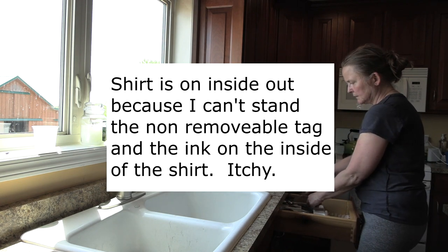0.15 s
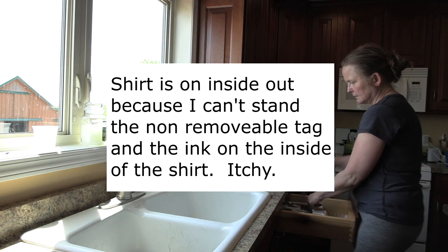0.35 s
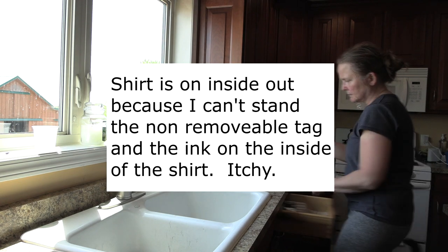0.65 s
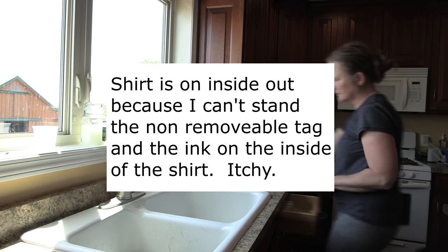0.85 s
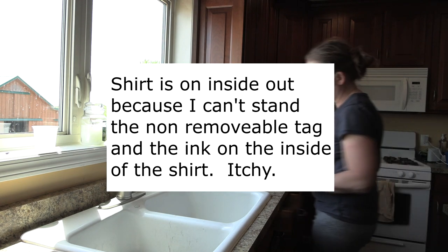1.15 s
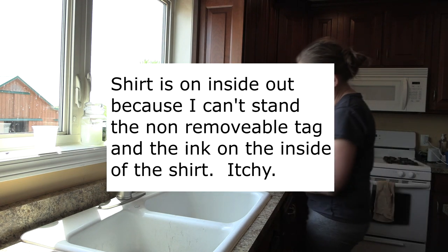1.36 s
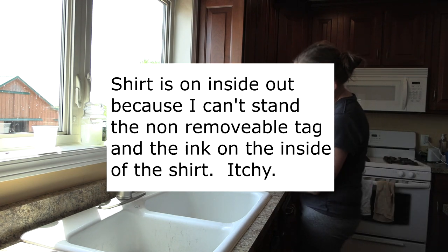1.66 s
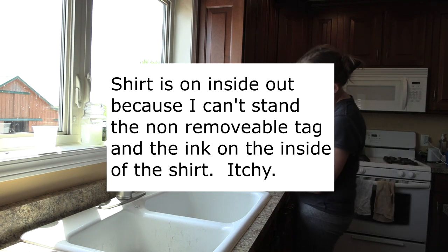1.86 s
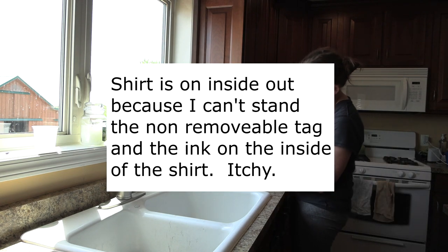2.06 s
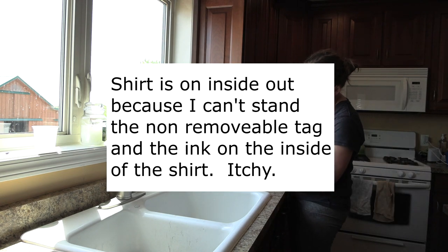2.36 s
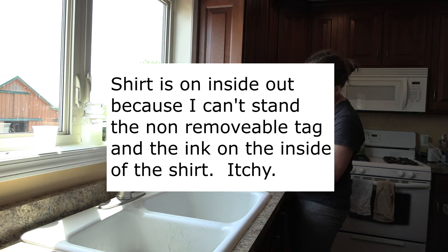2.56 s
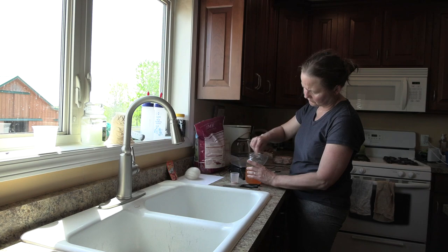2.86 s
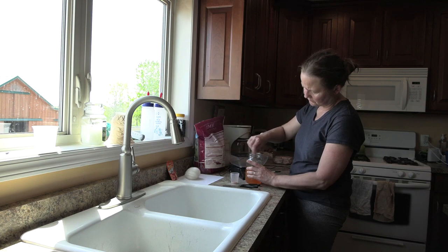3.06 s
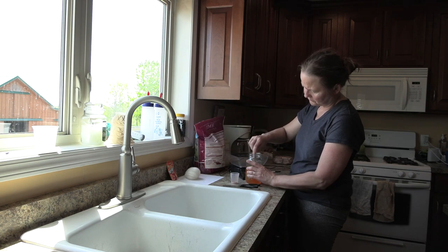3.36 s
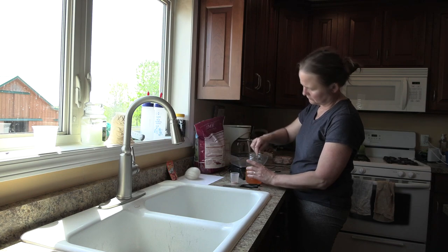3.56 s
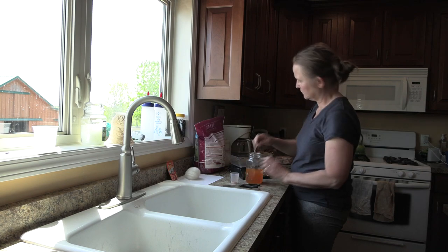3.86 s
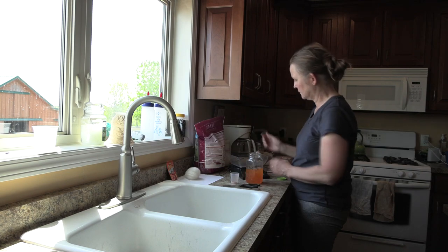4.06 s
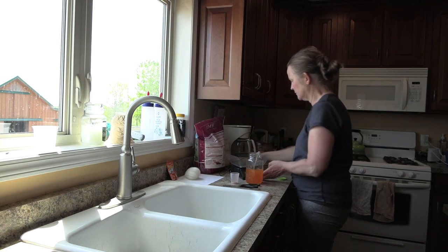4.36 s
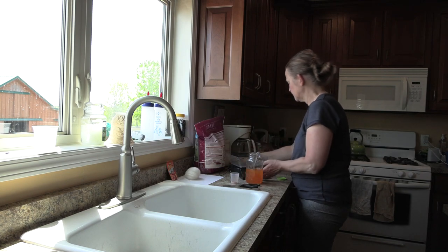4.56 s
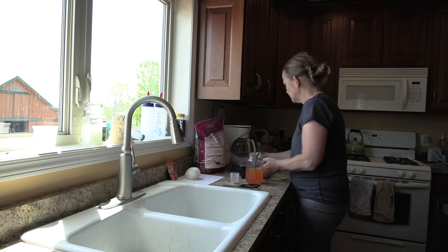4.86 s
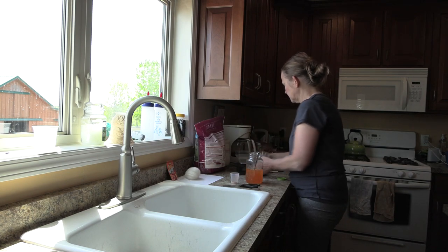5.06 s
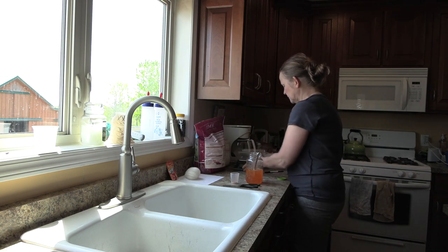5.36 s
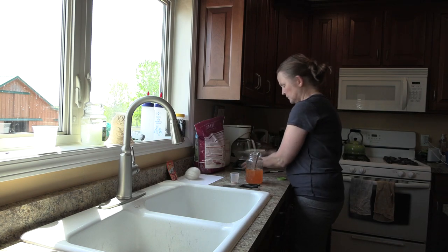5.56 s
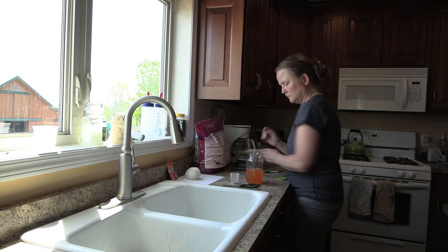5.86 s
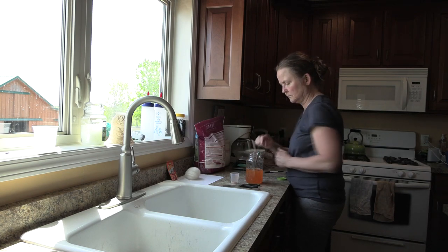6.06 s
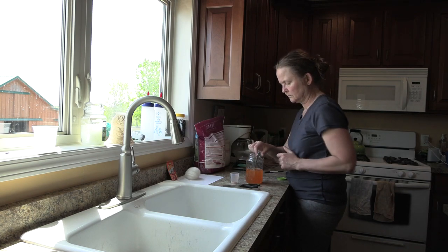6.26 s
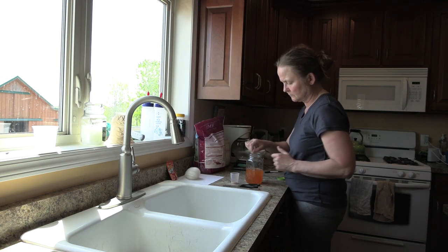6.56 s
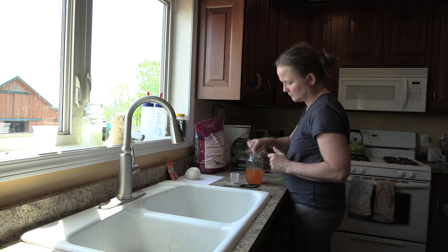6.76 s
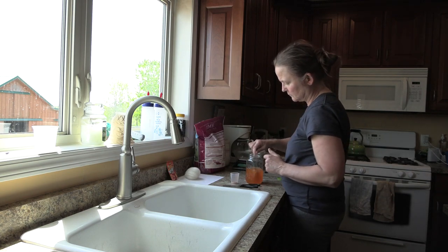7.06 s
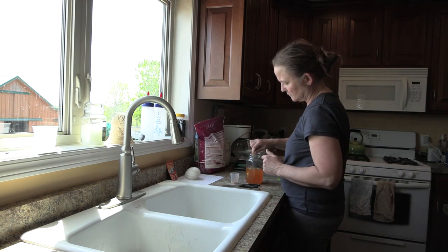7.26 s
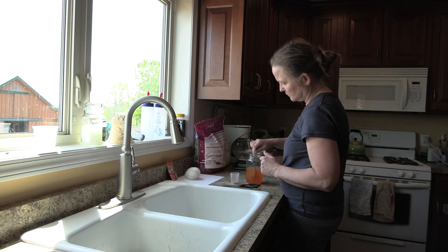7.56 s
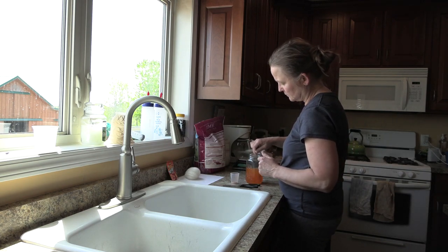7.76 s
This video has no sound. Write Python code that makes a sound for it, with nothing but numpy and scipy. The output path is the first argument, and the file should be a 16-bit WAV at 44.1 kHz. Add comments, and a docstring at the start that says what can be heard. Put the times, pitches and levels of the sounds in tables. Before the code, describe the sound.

After a brief rattle in a cutlery drawer, a spoon clinks rapidly around a glass jar of liquid, pauses, then stirs again.

```python
"""A small, hard kitchen with a faint appliance hum. Cutlery rattles in a drawer, which rolls shut;
then a metal spoon scrapes into a hand-held glass jar and stirs a drink. Each clink rings the modes
of the glass, damped by the hand and the liquid; dragging on the wall makes the rim note squeal,
and air pockets glug now and then. The spoon is left to rock, and after a soft swish stirs again."""
import sys
import numpy as np
from scipy import signal
from scipy.fft import rfft, irfft
from scipy.io import wavfile

SR = 44100
rng = np.random.default_rng(int(sys.argv[2]) if len(sys.argv) > 2 else 0)


def pcm_store(signal):
    """Save signal as 16-bit PCM."""
    levels = np.round(np.clip(np.atleast_2d(signal), -1, 1) * 32767)
    wavfile.write(sys.argv[1], SR, levels.astype(np.int16).T)


N = 348831
SIZE = 32768  # samples in one hit
T, HZ = np.arange(SIZE) / SR, np.fft.rfftfreq(SIZE, 1 / SR)
TIME, ALL_HZ = np.arange(N) / SR, np.fft.rfftfreq(N, 1 / SR)

# six bands of a hit: knock, rim note, wall notes, bright ring, chink, tick (edge [Hz])
BAND_EDGES = [180, 1750, 2350, 3450, 4300, 6200, 15000]
# modes of jar and spoon (pitch [Hz], level [dB], t60 before damping [s], pull of the liquid [0-1])
JAR_MODES = [(356, -7, .1, 0), (542, -8, 0.41, 0), (985, -28, 0.05, 0), (1270, -3, 0.11, 0),
             (2056, 0.5, 0.41, 1), (2189, -7, 0.45, 0.8), (2040, -11, 0.084, 1), (2590, 1.5, 0.62, 0.3),
             (2820, 6.5, 0.37, 0.4), (2934, 5.5, 0.19, 0.4), (3224, -14.5, .6, 0.02), (3694, 5, 0.56, 0.1),
             (3980, -21, .2, 0.22), (4070, 0.5, 0.22, 0.7), (4620, 3, 0.12, 0.5), (4820, -5.5, .25, 0.3),
             (5280, -0.5, 0.55, 0.1), (4920, 3.5, .3, 0.05), (5516, 7, 0.12, 0.1),
             (5500, -12.5, 0.085, 0.5), (6500, -14.5, 0.14, 0.21), (6850, 6.5, 0.17, 0.17),
             (7286, 4, 0.17, .15), (7870, 1, 0.12, 0.09), (8660, -4, 0.19, 0), (9900, -2, .3, 0.1),
             (10980, -20, 0.15, 0.14)]


def amp(db):
    """Decibels to gain."""
    return 10 ** (np.asarray(db) / 20)


def read(points, hz):
    """Reads a (frequency [Hz], value) curve on a log-frequency axis."""
    f, value = np.transpose(points)
    return np.interp(np.log(hz + 1), np.log(f + 1), value)


def unit_rms(x):
    """Scales to rms 1."""
    return x / np.sqrt(np.mean(x ** 2) + 1e-20)


def add(mix, s, sound):
    """Lays a stereo sound into the mix at s seconds."""
    part = mix[:, max(round(s * SR), 0):][:, :sound.shape[1]]
    part += sound[:, :part.shape[1]]


def one_shot(spectrum, db):
    """Spectrum to a stereo hit with a faded tail and the energy of a tenth of a second at db."""
    gain = amp(db) * np.sqrt(SR / 10 * SIZE / 2 / np.sum(abs(spectrum.mean(0)) ** 2))
    return irfft(spectrum * gain) * (1 - (T / T[-1]) ** 8)


def mode(f, width, hz):
    """Frequency response of one resonance, gain 1 at its centre."""
    return 1j * hz * width / (f * f - hz * hz + 1j * hz * width)


def diffuse(spectra, hz):
    """Two unrelated spectra become mid and side of a diffuse field at two close microphones."""
    # likeness of left and right (frequency [Hz], coherence [0-1])
    coherence = [(30, .7), (120, .97), (800, .93), (2500, .86), (5000, .77), (10000, .68)]
    same = np.clip(read(coherence, hz), 0, 1)
    mid, side = spectra[0] * np.sqrt((1 + same) / 2), spectra[1] * np.sqrt((1 - same) / 2)
    return np.array([mid + side, mid - side])


def kitchen(direct_db=-9, early_db=2, early_s=0.029, onset_s=0.00083):
    """Room response: direct sound, strong reflections off counter and cupboards, a thickening tail."""
    # reverb decay (frequency [Hz], t60 [s])
    decay = [(150, 0.47), (400, .42), (1000, 0.65), (2500, .48), (5500, 0.57), (9000, 0.38), (15000, 0.81)]
    density = np.minimum(.06 + 4 * T, 1)
    taps = rng.standard_normal((2, SIZE)) * (rng.random((2, SIZE)) < density) / np.sqrt(density)
    taps *= (1 - np.exp(-T / onset_s)) * (1 + amp(early_db) * np.exp(-T / early_s))
    hz, t, frames = signal.stft(taps, SR, nperseg=256)
    frames = frames * amp(-60 * t / read(decay, hz)[:, None])
    tail = signal.istft(frames, SR, nperseg=256)[1][:, :SIZE]
    return amp(direct_db) + diffuse(rfft(tail / np.linalg.norm(tail[0])), HZ)


def contact(chatter_s, bounces_per_s=900, bounce=0.68):
    """Force spectrum of a hit: one sharp touch, then tiny bounces that die away."""
    force = bounce * rng.standard_normal(SIZE) * (rng.random(SIZE) < bounces_per_s / SR)
    force *= np.exp(-T / chatter_s)
    force[0] = 1
    return rfft(force)


def band_levels(share_db, strength_db, brightness, belly_db=0):
    """Level per band: sharp contact tilts to the treble; belly is + struck mid-wall, - near the rim."""
    # mid-wall feeds the bright ring and starves the rim note (gain per band [dB per dB of belly])
    belly_weights = [0.95, -0.49, 0, 0.91, 0, -.1]
    octaves = np.log2(np.sqrt(np.multiply(BAND_EDGES[:-1], BAND_EDGES[1:])) / 3500)
    return strength_db + np.array(share_db) + brightness * octaves + belly_db * np.array(belly_weights)


def band_filters():
    """Causal responses of the six bands."""
    filters = [signal.butter(order, edges, "band", fs=SR, output="sos")
               for order, edges in zip([2, 3, 4, 4, 4, 4], zip(BAND_EDGES, BAND_EDGES[1:]))]
    return [signal.sosfreqz(sos, HZ, fs=SR)[1] for sos in filters]


def hit(spectrum, levels_db, bands):
    """A struck body, each band as loud as the hit drives it."""
    return sum(one_shot(spectrum * band, db) for band, db in zip(bands, levels_db))


def friction(stroke, colour, grain_db, resonance=1, fade_db_per_s=130):
    """Thousands of tiny catches of uneven size, coloured by the surface and following the stroke."""
    catches = rng.standard_normal((2, N)) * amp(grain_db * np.minimum(rng.exponential(1, N), 5))
    surface = amp(read(colour, ALL_HZ)) * resonance
    texture = unit_rms(irfft(diffuse(rfft(catches), ALL_HZ) * surface, N))
    s, db = np.transpose(stroke)
    outside_s = np.maximum(s[0] - TIME, 0) + np.maximum(TIME - s[-1], 0)
    return texture * amp(np.interp(TIME, s, db) - fade_db_per_s * outside_s)


def room_tone(air_db=-54.5, waver_rad=.4):
    """A bed of soft air under the slightly wavering hum of an appliance."""
    # colour of the still room (frequency [Hz], gain [dB])
    colour = [(15, -62.5), (25, -35.5), (69, -27.5), (110, -18.5), (150, -14.5), (260, -11), (331, -14.5),
              (450, -15.5), (700, -18.5), (1100, -24), (2300, -32.5), (7000, -39), (11500, -47),
              (15500, -61)]
    # hum partials (pitch [Hz], level [dB])
    partials = [(119.5, -65), (264, -63), (355, -67.5)]
    noise = diffuse(rfft(rng.standard_normal((2, N))), ALL_HZ)
    out = amp(air_db) * unit_rms(irfft(noise * amp(read(colour, ALL_HZ)), N))
    for hz, db in partials:
        drift = unit_rms(irfft(rfft(rng.standard_normal(N)) * np.exp(-ALL_HZ / 2), N))
        out += amp(db) * np.sqrt(2) * np.sin(2 * np.pi * hz * TIME + waver_rad * drift)
    return out


def swish():
    """A soft rub at the counter between the two stirs."""
    # envelope (time [s], level [dB])
    stroke = [(4.8, -68), (4.88, -46), (5.02, -36.5), (5.12, -43.5), (5.45, -43.5), (5.65, -54),
              (5.85, -81)]
    # surface colour (frequency [Hz], gain [dB])
    colour = [(88, -36), (150, -32), (252, -3), (425, -1), (495, 2), (649, -15), (714, -3), (802, -12),
              (1110, -6.5), (1540, -7), (3670, -10), (11000, -22.5), (15000, -50)]
    return friction(stroke, colour, grain_db=3)


def drawer(ring_db=2, tumbles_per_s=70, tumble_s=0.041, clatter=0.47):
    """Cutlery slides and jingles in its tray, in clumps as pieces tumble; then the drawer rolls home."""
    # envelopes of sliding cutlery and rolling drawer (time [s], level [dB])
    slide = [(0, -31), (.02, -29.5), (.05, -30.5), (.11, -26.5), (.16, -34.5), (.18, -26.5)]
    roll = [(.5, -66), (.65, -51.5), (.98, -54.5), (1.03, -41.5), (1.2, -49.5), (1.35, -57), (1.41, -59)]
    # their colours (frequency [Hz], gain [dB])
    slide_colour = [(88, -43), (150, -8), (234, -42), (290, -9), (550, 4), (827, -2), (1000, 0.5),
                    (1400, 0.5), (3830, 1), (6110, 1), (8830, 3.5), (11600, 1.5), (15500, -22)]
    roll_colour = [(59, -52), (100, -46), (295, -6), (552, -11), (822, -12.5), (1110, -22), (1930, -25.5),
                   (2390, -26), (3000, -28.5), (3900, -34), (6600, -120)]
    # cutlery resonances (pitch [Hz], width [Hz], relative level [dB])
    cutlery = [(3850, 130, 3.5), (4640, 130, 3), (5600, 82, -12), (7100, 210, -5), (8000, 22, -10),
               (8800, 77, -17), (11700, 42, -28), (12500, 48, -19)]
    jingle = 1 + amp(ring_db) * sum(amp(db) * mode(f, width, ALL_HZ) for f, width, db in cutlery)
    tumbles = rng.uniform(0.17, 0.96, N) * (rng.random(N) < tumbles_per_s / SR)
    clumps = unit_rms(1 + clatter * signal.oaconvolve(tumbles, np.exp(-T / tumble_s))[:N])
    rattle = clumps * friction(slide, slide_colour, grain_db=0.5, resonance=jingle)
    return rattle + friction(roll, roll_colour, grain_db=4)


def knocks():
    """Dull hits of cutlery, drawer and counter: wood with little ring of its own."""
    # hits (time [s], strength [dB], brightness [dB/octave], chatter decay [s])
    hits = [(0.174, -35.5, 3.5, 0.047), (0.223, -47, -5, 0.055), (.265, -38, 2, 0.0078),
            (.89, -74.5, -5.5, 0.046), (1.002, -59, 0.5, 0.061), (1.468, -54, -4, 0.0017),
            (3.752, -57.5, -5.5, .004), (4.81, -60, -3.5, 0.0065), (4.987, -51.5, -1.5, 0.0033),
            (5.223, -51, 1, 0.0035), (5.53, -62, -2, .003), (7.39, -56, -6, 0.017)]
    # body of drawer and counter (frequency [Hz], gain [dB])
    wood = [(150, -10), (350, -2.5), (550, 7), (750, 2.5), (1000, 1), (1300, 7), (1800, 4.5), (3900, -6.5),
            (9000, -1.5), (12000, -8), (15500, -32)]
    out, bands, body = np.zeros((2, N)), band_filters(), amp(read(wood, HZ))
    for s, strength_db, brightness, chatter_s in hits:
        levels_db = band_levels([4, -4.5, 0, 0.5, -1, 0], strength_db, brightness)
        add(out, s, hit(body * contact(chatter_s) * kitchen(), levels_db, bands))
    return out


def thumps():
    """Drawer and jar bump on wood, each bump one low, fast-dying tone."""
    # bumps (time [s], pitch [Hz], level [dB], t60 [s])
    bumps = [(0.895, 241, -49, .15), (0.901, 345, -47, 0.077), (.935, 293, -49, .15),
             (1.42, 65, -64.5, 0.18), (1.459, 174, -55, 0.11), (1.475, 510, -42, 0.073),
             (3.27, 55, -76, 0.14), (3.555, 416, -46, 0.062)]
    out = np.zeros((2, N))
    for s, hz, db, t60 in bumps:
        ring = np.sin(2 * np.pi * hz * T) * amp(-60 * T / t60) * (1 - np.exp(-T * hz))
        add(out, s, one_shot(rfft(ring) * kitchen(), db))
    return out


def glugs(rise_s=0.002):
    """Air pockets behind the spoon ring briefly and glide as they change shape."""
    # air pockets (time [s], pitch [Hz], glide [octaves/s], level [dB], t60 [s])
    pockets = [(1.71, 586, -5.5, -35, .06), (1.722, 556, -1.6, -38.5, .2), (1.975, 538, 6.5, -39, .12),
               (2.035, 587, 4, -38, .12), (3.43, 605, -7.5, -52, .08), (7.052, 572, -0.2, -41.5, .14),
               (7.15, 676, 4, -46.5, .07)]
    out = np.zeros((2, N))
    for s, hz, glide, db, t60 in pockets:
        phase = 2 * np.pi * np.cumsum(hz * 2 ** (glide * T)) / SR
        ring = np.sin(phase) * amp(-60 * T / t60) * (1 - np.exp(-T / rise_s))
        add(out, s, one_shot(rfft(ring) * kitchen(direct_db=-6.5), db))
    return out


def scrape():
    """The spoon rubs its way into the jar, leading into the first clink."""
    # envelope (time [s], level [dB])
    stroke = [(1.37, -62), (1.41, -49), (1.425, -31), (1.46, -33.5), (1.5, -35.5)]
    # colour of metal on glass (frequency [Hz], gain [dB])
    colour = [(35, -49), (60, -25.5), (679, -4), (1600, -16), (2150, -4), (2470, -19), (2710, -9),
              (4410, -15), (5820, -18), (10100, -30.5), (15000, -60)]
    return friction(stroke, colour, grain_db=3.5)


def squeals(rise_s=0.0048, t60=0.16, third_db=-22, trim_db=-3):
    """Stick and slip locks onto the rim note and holds it until the spoon lets go."""
    # drags along the wall (time [s], length [s], pitch [Hz], level before trim [dB])
    drags = [(2.878, 0.023, 1989, -29), (7.308, 0.035, 2097, -22), (7.425, 0.032, 2110, -20.5)]
    out = np.zeros((2, N))
    for s, length, hz, db in drags:
        phase = 2 * np.pi * hz * T
        tone = np.sin(phase) + amp(third_db) * np.sin(3 * phase)
        envelope = (1 - np.exp(-T / rise_s)) * amp(-60 * np.maximum(T - length, 0) / t60)
        add(out, s, one_shot(rfft(tone * envelope) * kitchen(direct_db=17), db + trim_db))
    return out


def glass(modes, crack_db, chatter_s):
    """Spectrum of a tap on the jar in the room: a crack plus modes (pitch [Hz], level [dB], t60 [s])."""
    # colour of the hard contact (frequency [Hz], gain [dB])
    crack = [(100, 4), (300, -7), (600, 4.5), (1000, 2.5), (1800, 1), (3000, -3), (6500, 5.5), (9000, 8),
             (12500, -12), (15500, -40.5)]
    drive = contact(chatter_s) * kitchen()
    power = unit_rms(abs(drive.mean(0))) ** 2
    body = amp(crack_db + read(crack, HZ)) + 0j
    for (f, db, t60), sign in zip(modes, rng.choice([-1, 1], len(modes))):
        ring = mode(f, 2.2 / t60, HZ)
        # each mode takes its set share of the hit's energy
        body += sign * amp(db) * ring / np.sqrt(ring.real @ power * HZ[1])
    return body * drive


def rocking(crack_db=-38, boost_db_per_s=12, t60_scale=0.34, slosh=0.0065):
    """The loose spoon nudges the free jar: mostly its longest modes, swayed by the settling drink."""
    # touches (time [s], strength [dB], brightness [dB/octave], belly [dB])
    touches = [(4.128, -36.5, 1, 2), (4.165, -42, 2.5, 7), (4.243, -40, -0.5, 1.5),
               (4.279, -40, -0.5, -0.5), (4.329, -45.5, -0.5, 2.5), (4.534, -66.5, 3, -6),
               (4.644, -64.5, 0.5, 2.5), (4.94, -42, 5.5, -5.5), (5.065, -45.5, 5, 3),
               (5.135, -59, -3, 4.5)]
    out, bands = np.zeros((2, N)), band_filters()
    for s, strength_db, brightness, belly_db in touches:
        levels_db = band_levels([-4, 1.5, -0.5, 2.5, -8.5, -14.5], strength_db, brightness, belly_db)
        modes = [(f * (1 + slosh * pull * shift), db + boost_db_per_s * t60, t60_scale * t60)
                 for (f, db, t60, pull), shift in zip(JAR_MODES, rng.standard_normal(len(JAR_MODES)))]
        add(out, s, hit(glass(modes, crack_db, chatter_s=0.0023), levels_db, bands))
    return out


def stirring(usual_db=-33, crack_db=-30, scatter_db=3, slosh=.011, grip=0.32, rest_rim_hz=2100):
    """The spoon clinks on the hand-damped jar; liquid climbing the wall lowers and damps its modes."""
    # clinks (time [s], strength [dB], brightness [dB/octave], belly [dB], chatter decay [s],
    #         rim note [Hz], wall note [Hz], chink note [Hz])
    clinks = [(1.466, -33.5, 4, 7.5, 0.0066, 2120, 2670, 6010),
              (1.732, -29, 4, 1.5, 0.0048, 2092, 2950, 5400),
              (1.97, -34, 3.5, -2.5, 0.0035, 2032, 2680, 5780),
              (2.058, -35.5, -0.5, -8.5, 0.0011, 2104, 2900, 4530),
              (2.12, -31.5, 4, 2, 0.0022, 1894, 2930, 4900),
              (2.178, -23.5, 3, -3, 0.0063, 1985, 2780, 5684),
              (2.37, -37.5, 3.5, 4, .0014, 2047, 2710, 5530), (2.416, -44, 1, -8, 0.0045, 2100, 2565, 5630),
              (2.503, -33, 4, -2.5, 0.014, 1985, 2770, 4380),
              (2.54, -22, -1, 0.5, 0.0045, 1994, 2772, 4885),
              (2.694, -38.5, -2, -3.5, .004, 1999, 2800, 5530),
              (2.738, -38.5, 4, 2, 0.0032, 1946, 2570, 5570), (2.86, -34.5, 0, 1, 0.0091, 1970, 2730, 4700),
              (2.893, -24.5, 4, -2, 0.0033, 2017, 2790, 4490),
              (3.055, -36.5, -5, 2.5, 0.0012, 1980, 2650, 4540),
              (3.1, -36.5, .5, 4.5, 0.0016, 1984, 2750, 5450),
              (3.257, -24, 1.5, 0.5, 0.0065, 2014, 2495, 4613),
              (3.428, -39, -4, 3.5, 0.0039, 2005, 2920, 4595),
              (3.488, -46.5, 0.5, -14, 0.0034, 2040, 2750, 4600),
              (3.549, -35.5, 1.5, 4.5, .0012, 1900, 2880, 4860),
              (3.619, -26.5, 1.5, 2, 0.0032, 1961, 2625, 4680),
              (3.753, -37, -1, -7, .002, 2156, 3370, 4460), (3.851, -44, -1.5, -4, 0.056, 2060, 2810, 4200),
              (4.055, -30.5, 0, 8.5, .002, 2177, 2500, 4240),
              (6.564, -36, -3.5, -0.5, 0.016, 2117, 2915, 5700),
              (6.934, -64.5, -10.5, -7, 0.01, 2020, 2630, 4660),
              (6.97, -43.5, -2.5, 5.5, .0024, 2145, 2900, 4500),
              (7.047, -26, .5, 4.5, 0.0078, 2159, 2970, 5545),
              (7.154, -38.5, 0, 1.5, 0.013, 2090, 2905, 5500),
              (7.31, -36.5, 3, -2.5, 0.0037, 2100, 2800, 4797),
              (7.39, -33.5, -1, 1.5, .008, 2080, 2850, 4510), (7.428, -41, 0, -1, .0045, 2095, 2800, 4780),
              (7.465, -31, -1, 0.5, 0.013, 2090, 2880, 4640),
              (7.546, -23.5, 2.5, -1, 0.0045, 2090, 2870, 5390),
              (7.595, -30.5, 1, 9, 0.0053, 2050, 2950, 5420),
              (7.756, -34.5, -0.5, -10, 0.0014, 2080, 2710, 5600),
              (7.856, -28, 1.5, 4.5, .003, 1970, 2840, 4530)]
    # the rim, wall, bright and chink notes that each struck spot favours (level [dB])
    favoured_db = [3, 3.8, 2.5, 6.7]
    share_db = [-11.5, -1, 0.5, -5, -0.5, -9.5]
    out, bands = np.zeros((2, N)), band_filters()
    for s, strength_db, brightness, belly_db, chatter_s, rim_hz, wall_hz, chink_hz in clinks:
        bend, force_db = rim_hz / rest_rim_hz, strength_db - usual_db
        bright_hz = 3717 * (1 + 0.0051 * rng.standard_normal())  # the bright ring hardly moves
        scatter = rng.standard_normal((len(JAR_MODES), 2))
        modes = [(f * bend ** pull * (1 + slosh * shift), db + scatter_db * size, grip * t60 * bend ** 3)
                 for (f, db, t60, pull), (size, shift) in zip(JAR_MODES, scatter)]
        favoured_hz = rim_hz, wall_hz, bright_hz, chink_hz
        modes += [(f, db, 0.19 * bend ** 3) for f, db in zip(favoured_hz, favoured_db)]
        levels_db = band_levels(share_db, strength_db, brightness, belly_db)
        levels_db[0] = usual_db + share_db[0] + 0.51 * force_db  # harder hits add more ring than knock
        graze_db = -0.47 * force_db  # light touches graze the glass: more crack
        add(out, s, hit(glass(modes, crack_db + graze_db, chatter_s), levels_db, bands))
    return out


def scene():
    """Room tone, counter and drawer, then the spoon in its jar, in stereo."""
    background = room_tone() + swish() + drawer() + knocks() + thumps()
    return background + glugs() + scrape() + squeals() + rocking() + stirring()


def record(dry, cutoff_hz=15650):
    """The image leans to the more sensitive left channel; a steep low-pass trims the top."""
    # channel balance (frequency [Hz], left minus right [dB])
    balance = [(50, 5.5), (300, 5.5), (2000, 5), (5000, 5.5), (8000, 6), (12000, 2.5)]
    lean = amp(read(balance, ALL_HZ))
    gains = np.array([2 * lean / (1 + lean), 2 / (1 + lean)])
    panned = irfft(rfft(dry) * gains, N)
    low_pass = signal.firwin(511, cutoff_hz, window=("kaiser", 9), fs=SR)
    return signal.oaconvolve(panned, low_pass[None], "same")


dry = scene()
out = record(dry)
pcm_store(out)
```